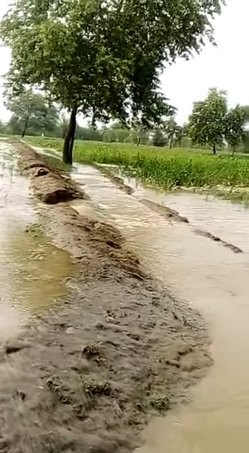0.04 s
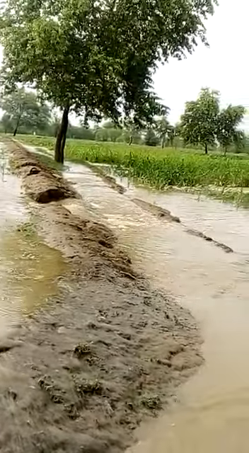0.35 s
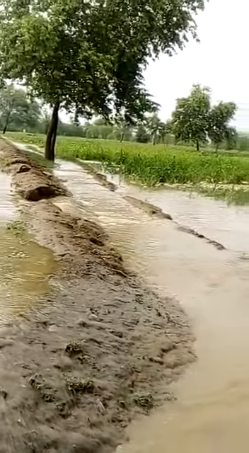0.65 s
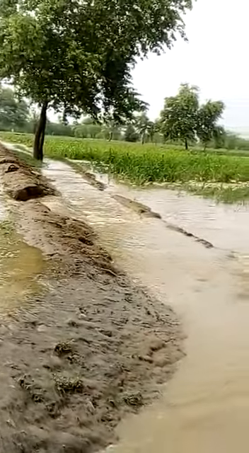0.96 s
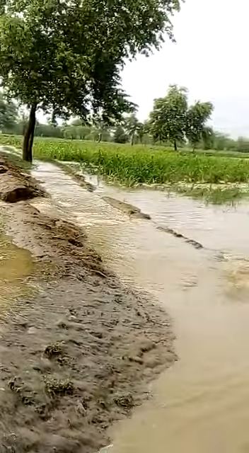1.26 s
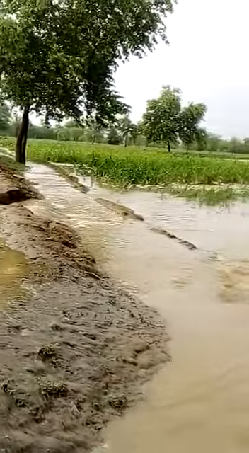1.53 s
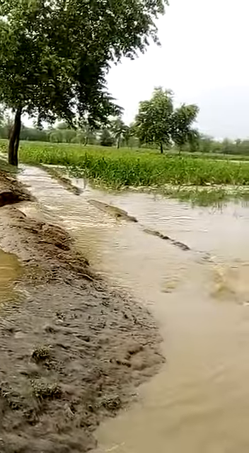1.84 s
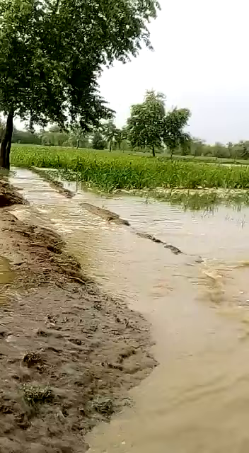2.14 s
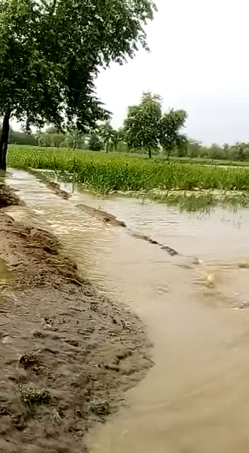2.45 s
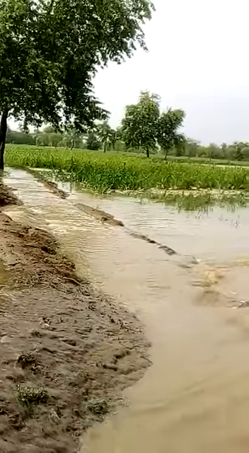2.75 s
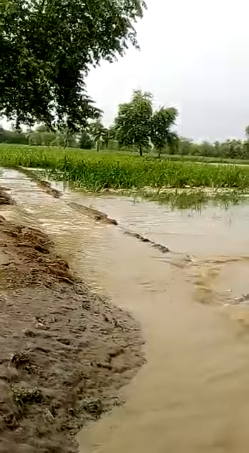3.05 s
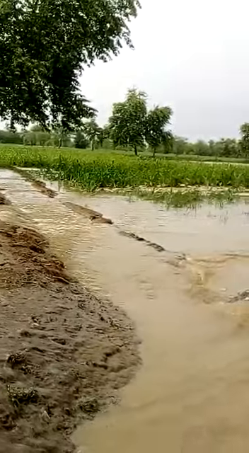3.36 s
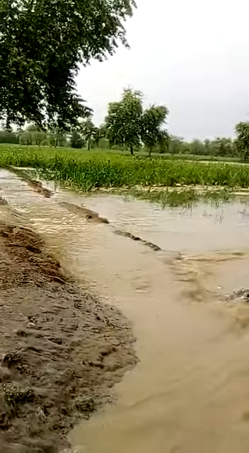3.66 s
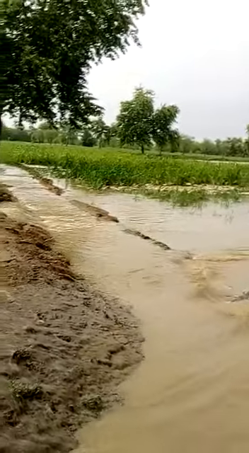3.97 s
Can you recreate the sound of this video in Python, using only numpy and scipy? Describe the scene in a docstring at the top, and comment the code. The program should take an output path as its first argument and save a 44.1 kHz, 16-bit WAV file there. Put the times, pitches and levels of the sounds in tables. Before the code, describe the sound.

Steadily running, bubbling water with small plops and a few short bird chirps.

```python
"""Muddy floodwater runs steadily past an earth bank in open fields.
Throughout: a soft rush with swarms of ringing bubbles and spray, over a faint rumble.
From the start, nearer by, drops tick and bubbles plop; short sprinkles of spray follow.
At 0.7 s a small bird in a tree gives one short, arched, two-voiced chirp. Air pockets gulp at
1.4 and 1.8 s. Five more chirps come from 2.1 to 3.3 s, a last gulp at 3.6 s."""
import sys
import numpy as np
from scipy import signal
from scipy.fft import rfft, irfft, next_fast_len
from scipy.io import wavfile
from scipy.ndimage import uniform_filter1d, map_coordinates

SR = 44100
rng = np.random.default_rng(int(sys.argv[2]) if len(sys.argv) > 2 else 0)


def generate_wav(signal):
    """Clip the signal to [-1, 1] and save it as 16-bit WAV at the path in sys.argv[1]."""
    frames = np.transpose(np.atleast_2d(signal))
    scaled = np.clip(frames, -1, 1) * 32767
    pcm = np.round(scaled).astype(np.int16)
    wavfile.write(sys.argv[1], SR, pcm)


N = 176400

# stream gain over time: t/s, gurgle/dB, spray/dB
FLOW_GAINS = [(0, 0.5, 3), (0.399, -1.5, 1), (.65, 0, 1.5), (.8, 0, 0.5), (1, 0, 0.5), (1.4, 1, 0.5),
              (1.7, 1.5, -2.5), (2.3, .5, 1), (2.55, 1, 0), (3, 1, 0.5), (3.3, 0.5, 0), (3.75, 0.5, 4),
              (4, 1, 0.5)]
# rush spectrum: f/Hz, relative density/dB
RUSH_SPECTRUM = [(25, -35.5), (70, -27.5), (130, -22.5), (240, -16), (300, -12), (355, -9.5), (450, -9.5),
                 (570, -9), (850, -2), (1500, 0), (2350, 3), (2700, -5.5), (3100, -7.5), (3700, 1),
                 (4600, 0), (5250, -1.5), (5750, -10.5), (6550, -14.5), (7200, -27.5), (8300, -39.5),
                 (11000, -44), (14000, -43), (15200, -35)]
# bubble swarms: rate/(1/s), centre/Hz, spread/octaves, decay/cycles, gain per size/dB, level/dB
GURGLE_SWARM = (519.5, 1480, 0.49, 4, 3.5, -56)
BURBLE_SWARM = (130, 379.5, 0.24, 8, -2.5, -71)
SPRAY_SWARM = (480, 4697, 0.31, 3, 5, -54.5)
MIST_SWARM = (299, 8600, 0.4, 4, 6, -87.5)
# swarm filters: f/Hz, gain/dB
GURGLE_EQ = [(450, -24.5), (650, -2), (850, -1), (2400, 1.5), (2850, -5.5), (3600, -4)]
MIST_EQ = [(6000, -4), (8000, -2), (9800, -1), (10800, -14.5), (13000, -30.5)]
# dull microphone, on the spray swarm and near water: f/Hz, gain/dB
MIC_EQ = [(2400, -3), (2850, -1), (3600, 2.5), (5200, -1), (6600, -4.5), (7400, -17.5), (8400, -28.5),
          (10000, -30), (12000, -41.5)]
# near drops: t/s, level/dB, f/Hz, decay/s
NEAR_DROPS = [(0.026, -26.5, 3980, 0.0011), (0.0992, -38, 4050, 0.0011), (0.2187, -25.5, 4510, 0.0015),
              (0.2949, -27, 4360, 0.00071), (0.3704, -36.5, 3750, 0.0011), (0.4173, -32.5, 3540, 0.0012),
              (0.449, -35.5, 3570, 0.00099), (0.4942, -29.5, 3810, 0.00068), (0.5333, -27.5, 4050, 0.00079),
              (0.775, -29, 4980, 0.00081), (1.071, -31.5, 4610, 0.00074), (1.3826, -29.5, 4800, 0.0009),
              (1.482, -26, 3940, 0.0012), (1.4962, -34, 4600, 0.0009), (1.6102, -36.5, 3860, 0.0009),
              (1.6742, -35, 4350, 0.0011), (1.762, -34, 4220, 0.0011), (1.8327, -31.5, 4600, 0.0008),
              (1.8588, -33.5, 4400, 0.0009), (1.921, -37.5, 3770, 0.001), (1.9345, -36, 3600, 0.0009),
              (1.9685, -35.5, 6140, 0.0012), (1.9775, -29.5, 4590, 0.0013), (2.0883, -30, 4360, 0.0011),
              (2.2452, -31, 4530, 0.0012), (2.262, -32.5, 3530, 0.00098), (2.358, -30.5, 4120, 0.00075),
              (2.4205, -34, 4700, 0.0009), (2.559, -26, 4260, 0.00067), (2.6128, -32.5, 4150, 0.0009),
              (2.6513, -30, 3930, 0.001), (2.7232, -35, 4100, 0.0015), (2.7895, -31, 5000, 0.001),
              (2.9356, -38, 3600, 0.001), (2.9744, -23.5, 4590, 0.00048), (3.2397, -33, 4600, 0.001),
              (3.4087, -37, 3700, 0.0009), (3.5222, -27, 3500, 0.00075), (3.701, -30.5, 2870, 0.0014),
              (3.713, -31, 3940, 0.0011), (3.7918, -32, 3720, 0.0011)]
# near bubbles: t/s, level/dB, f/Hz
NEAR_PLOPS = [(0.001, -33.5, 1800), (0.032, -38, 1190), (0.046, -40, 1800), (0.254, -43, 907),
              (0.306, -35.5, 1640), (0.323, -37.5, 2200), (0.344, -38.5, 1570), (0.359, -42, 866),
              (0.397, -36, 2190), (1.105, -37.5, 1680), (1.243, -36.5, 1500), (1.537, -37.5, 1770),
              (1.564, -34.5, 1680), (1.696, -30.5, 1450), (1.74, -36.5, 1240), (1.82, -46, 910),
              (1.922, -35.5, 1150), (1.971, -37.5, 1590), (2.011, -33, 1920), (2.144, -41.5, 1040),
              (2.213, -42, 930), (2.261, -38, 895), (2.275, -42, 2080), (2.292, -30, 1940),
              (2.37, -37.5, 1380), (2.616, -35.5, 2270), (2.669, -38.5, 1400), (2.844, -34.5, 1490),
              (3.013, -36, 1545), (3.084, -39, 1440), (3.407, -39, 1440), (3.588, -34.5, 1230),
              (3.659, -32, 1660), (3.743, -33.5, 1820), (3.79, -36, 1410)]
# trapped air: t/s, level/dB, f/Hz, decay/s
AIR_GULPS = [(1.376, -44.5, 349, 0.0298), (1.758, -51.5, 482, 0.015), (3.583, -46.5, 468, 0.0126)]
# chirps: t/s, length/s, low voice top/Hz, high voice top/Hz, end sag/fraction, low/dB, high/dB
BIRD_CHIRPS = [(0.687, 0.05, 3886, 4300, .11, -43.5, -54), (2.092, 0.044, 3950, 4570, 0.12, -42, -48),
               (2.271, 0.048, 3700, 4160, 0.08, -41, -41), (2.637, 0.06, 4120, 4420, 0.2, -43, -44.5),
               (3, 0.074, 4330, 4800, 0.3, -40.5, -39.5), (3.294, .051, 4020, 4630, 0.14, -38.5, -40.5)]
# bursts of fine spray: t/s, length/s, level/dB, f/Hz
SPRAY_BURSTS = [(0.306, 0.026, -64, 7400), (.51, 0.03, -73, 7900), (0.741, 0.04, -51, 5600),
                (0.753, 0.099, -83, 9000), (1.062, 0.091, -86, 9600), (1.825, 0.016, -48, 5560),
                (2.524, .024, -49.5, 6380), (2.557, 0.0087, -40, 5980), (2.609, 0.038, -76, 8700),
                (2.94, 0.076, -86, 9200), (3.208, .016, -49, 5800), (3.664, 0.014, -50, 5610),
                (3.793, 0.058, -76.5, 9100), (3.8, 0.045, -43.5, 4500)]
# rumble of the current: t/s, level/dB
RUMBLE_ENVELOPE = [(0, -89.5), (1.3, -89), (1.39, -76), (1.6, -87), (1.97, -81.5), (2.2, -86),
                   (3.35, -85.5), (3.6, -77), (3.85, -78), (4, -89)]
# rumble spectrum: f/Hz, relative density/dB
RUMBLE_SPECTRUM = [(40, -30), (80, -13.5), (120, -1), (180, -2), (260, -9.5), (600, -52), (2000, -100)]


def stream():
    """Rush, gurgle and spray follow the flow; the spray comes in clumps."""
    times_s, *gains_db = np.transpose(FLOW_GAINS)
    gurgle_gain, spray_gain = [amp(np.interp(np.arange(N) / SR, times_s, db)) for db in gains_db]
    spray = coloured(swarm(*SPRAY_SWARM), MIC_EQ) + coloured(swarm(*MIST_SWARM), MIST_EQ)
    spray *= amp(2.9 * wobble(rate_hz=24.94))
    bed = np.sqrt(gurgle_gain * spray_gain) * rush()
    gurgle = coloured(swarm(*GURGLE_SWARM), GURGLE_EQ) + swarm(*BURBLE_SWARM)
    return bed + gurgle_gain * gurgle + spray_gain * spray


def rush(level_db=-50, patch_db=1.82, surge_db=0.23, flutter_db=-0.1):
    """The whole stream blurs into noise, swelling in patches of time and frequency."""
    spectrogram = signal.stft(rng.standard_normal(N), nperseg=256)[2]
    patches = uniform_filter1d(rng.standard_normal(spectrogram.shape), size=4, axis=0)
    patches = uniform_filter1d(patches, size=8, axis=1)
    noise = signal.istft(spectrogram * amp(patch_db * unit(patches)), nperseg=256)[1][:N]
    gain = amp(level_db + surge_db * wobble(rate_hz=5.86) + flutter_db * wobble(rate_hz=45))
    return gain * unit(coloured(noise, RUSH_SPECTRUM))


def swarm(rate_per_s, centre_hz, spread_octaves, decay_cycles, size_db, level_db):
    """Many bubbles ring at random times: log-normal pitch, truncated exponential size."""
    max_size, attack_cycles = 1.95, 2.3
    out = np.zeros(N)
    for when, radius, angle, size_draw, decay_draw in rng.random((int(rate_per_s * N / SR), 5)):
        gaussian = np.sqrt(-2 * np.log(1 - radius)) * np.cos(2 * np.pi * angle)
        hz = centre_hz * 2 ** (spread_octaves * gaussian)
        size = -np.log(1 - size_draw * (1 - np.exp(-max_size)))
        decay_s = decay_cycles * 2 ** (2 * decay_draw - 1) / hz
        ring = bubble(hz, attack_cycles / hz, decay_s, rise=0.031)
        add(out, when * N / SR, amp(size_db * size) * ring)
    return amp(level_db) * unit(out)


def bubble(hz, attack_s, decay_s, rise, splash=0):
    """Damped ring of peak 1; pitch climbs by the fraction rise per decay time; splash adds hiss."""
    t = np.arange(int((attack_s + 6 * decay_s) * SR)) / SR
    ring = np.sin(2 * np.pi * hz * t * (1 + rise * t / decay_s / 2))
    if splash:
        ring += splash * hiss(hz, count=SR // 20)[:len(t)]
    sound = ring * (1 - np.exp(-(t / attack_s) ** 2)) * np.exp(-t / decay_s)
    return sound / np.abs(sound).max()


def drops(tick_gain_db=-1, wash_gain_db=-22, wash_decay_s=0.006):
    """Each drop ticks on the water and trails a wet hiss."""
    out = np.zeros(N)
    t = np.arange(SR // 20) / SR
    for start_s, db, hz, decay_s in NEAR_DROPS:
        tick = bubble(hz, attack_s=0.0012, decay_s=decay_s, rise=0, splash=0.46)
        add(out, start_s, amp(db + tick_gain_db) * tick)
        wash = (1 - np.exp(-t / decay_s)) * np.exp(-t / wash_decay_s) * hiss(hz, count=len(t))
        add(out, start_s, amp(db + wash_gain_db) * wash)
    return out


def plops(gain_db=-0.5, decay_cycles=5.05):
    """Single bubbles by the bank ring with rising pitch."""
    out = np.zeros(N)
    for start_s, db, hz in NEAR_PLOPS:
        ring = bubble(hz, attack_s=0.001, decay_s=decay_cycles / hz, rise=0.061)
        add(out, start_s, amp(db + gain_db) * ring)
    return out


def gulps():
    """Pockets of trapped air ring low, with a soft onset."""
    out = np.zeros(N)
    for start_s, db, hz, decay_s in AIR_GULPS:
        add(out, start_s, amp(db) * bubble(hz, attack_s=0.012, decay_s=decay_s, rise=0.08))
    return out


def bird(skew=0.87, waver=0.013):
    """Two voices rise and fall in one pitch arch."""
    out = np.zeros(N)
    for start_s, length_s, low_hz, high_hz, sag, low_db, high_db in BIRD_CHIRPS:
        progress = np.linspace(0, 1, int(length_s * SR))
        arch = 1 - sag * (2 * progress ** skew - 1) ** 2
        swell = np.abs(np.sin(np.pi * progress))
        for hz, db, envelope in ((low_hz, low_db, np.sqrt(swell)), (high_hz, high_db, swell)):
            pitch_hz = hz * arch * (1 + waver * wobble(rate_hz=600, count=SR // 4)[:len(arch)])
            add(out, start_s, amp(db) * envelope * np.sin(2 * np.pi * np.cumsum(pitch_hz) / SR))
    return out


def foliage(chirps, wet=0.33, t60_s=0.28):
    """Leaves scatter a faint tail after each chirp."""
    t = np.arange(SR // 2) / SR
    tail = rng.standard_normal(len(t)) * np.exp(-np.log(1000) * t / t60_s)
    return chirps + wet * signal.fftconvolve(chirps, tail / np.linalg.norm(tail))[:N]


def sprinkles(grain_db=7):
    """Fine spray falls back on the water in short grainy bursts."""
    out = np.zeros(N)
    for start_s, length_s, db, hz in SPRAY_BURSTS:
        grains = hiss(hz, count=SR // 4, half_width_hz=740)
        grains *= amp(grain_db * wobble(rate_hz=300, count=SR // 4))
        envelope = np.hanning(int(length_s * SR))
        add(out, start_s, amp(db) * envelope * unit(grains)[:len(envelope)])
    return out


def rumble():
    """The current churns faintly below the gurgle."""
    level_db = np.interp(np.arange(N) / SR, *np.transpose(RUMBLE_ENVELOPE))
    return amp(level_db) * unit(coloured(rng.standard_normal(N), RUMBLE_SPECTRUM))


def hiss(hz, count, half_width_hz=1200):
    """Noise band around hz."""
    phase = 2 * np.pi * hz * np.arange(count) / SR
    rate_hz = 2 * half_width_hz
    return wobble(rate_hz, count) * np.sin(phase) + wobble(rate_hz, count) * np.cos(phase)


def wobble(rate_hz, count=N):
    """Smooth random curve, rate_hz knots a second."""
    knots = rng.standard_normal(int(count * rate_hz / SR) + 4)
    return map_coordinates(knots, [np.arange(count) * rate_hz / SR])


def coloured(x, points):
    """Filter by (f/Hz, gain/dB) points on a log axis."""
    points_hz, db = np.transpose(points)
    return filtered(x, lambda hz: amp(np.interp(np.log(hz + 1), np.log(points_hz), db)))


def filtered(x, gain):
    """Zero-phase filter by gain(hz)."""
    size = next_fast_len(N + 8192)
    return irfft(rfft(x, size) * gain(np.fft.rfftfreq(size, 1 / SR)), size)[:N]


def add(track, start_s, sound):
    """Mix sound into track."""
    i = int(np.clip(round(start_s * SR), 0, N - 1))
    track[i:i + len(sound)] += sound[:N - i]


def amp(db):
    """dB to gain."""
    return 10 ** (np.asarray(db) / 20)


def unit(x):
    """Scale to rms 1."""
    return x / np.sqrt(np.mean(x ** 2) + 1e-20)


def scene():
    """Water and bird, mono."""
    current = stream() + rumble() + sprinkles()
    near_water = coloured(drops() + plops() + gulps(), MIC_EQ)
    return (current + near_water + foliage(bird()))[None]


def record(dry):
    """Brick-wall low-pass."""
    cutoff_hz = 15750
    return np.array([filtered(x, lambda hz: hz < cutoff_hz) for x in dry])


dry = scene()
out = record(dry)
generate_wav(out)
```